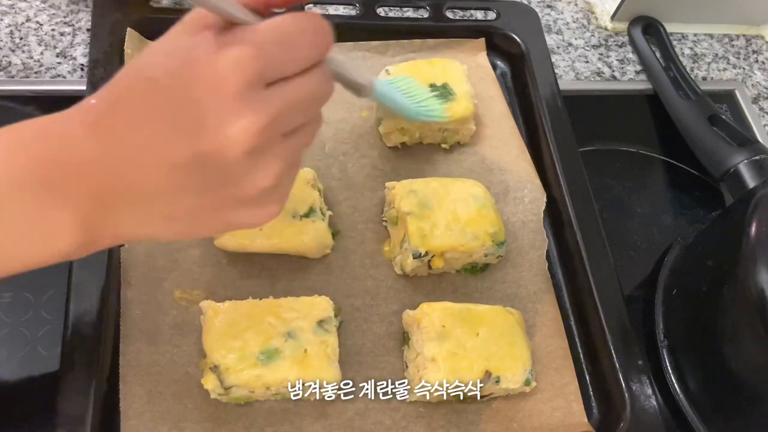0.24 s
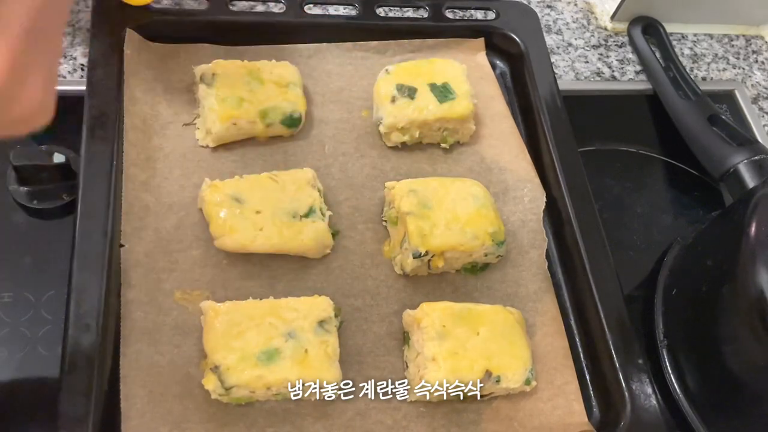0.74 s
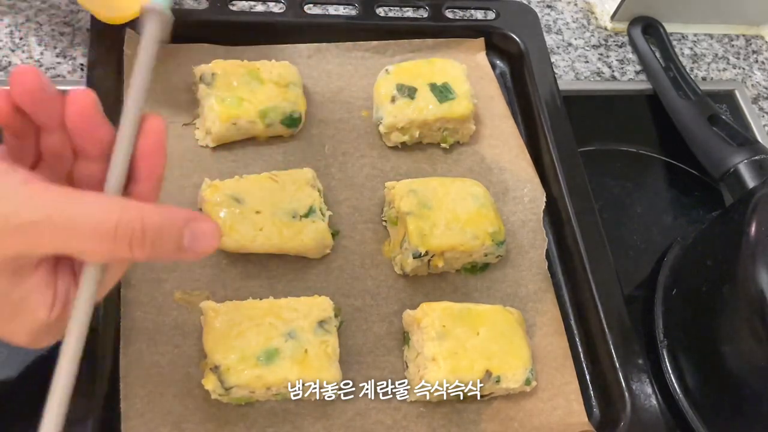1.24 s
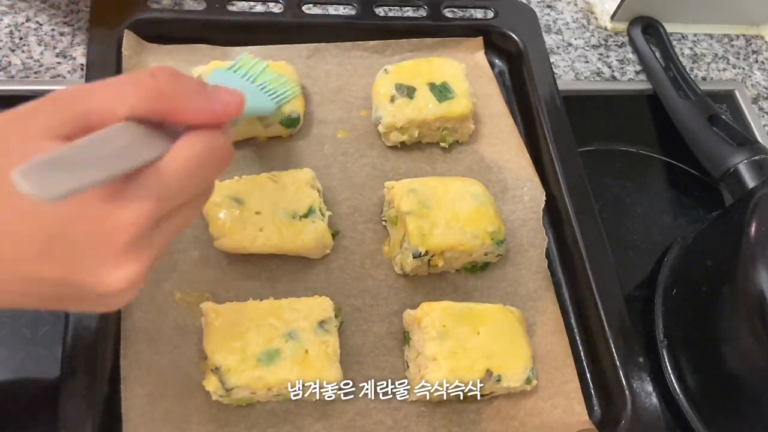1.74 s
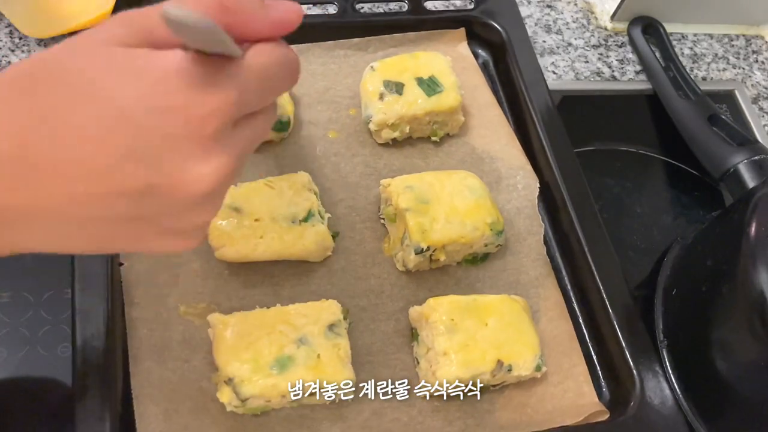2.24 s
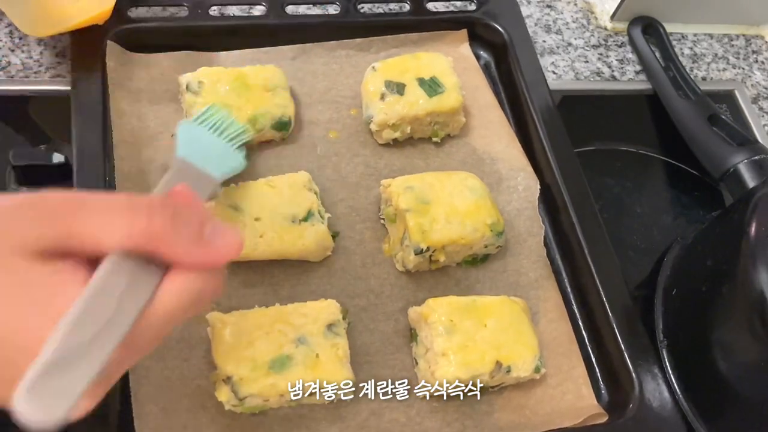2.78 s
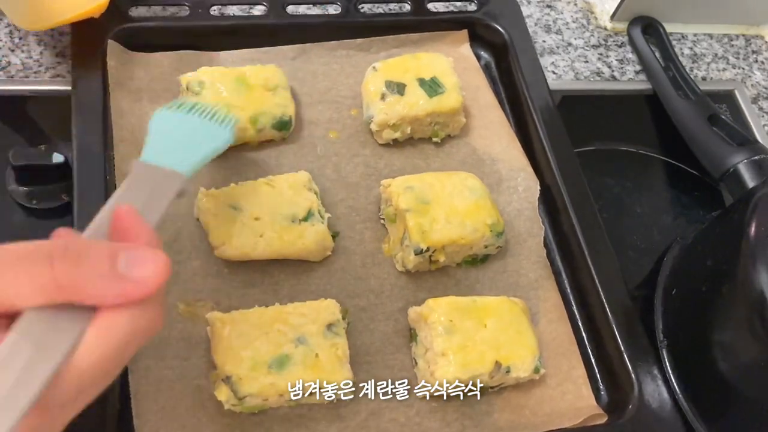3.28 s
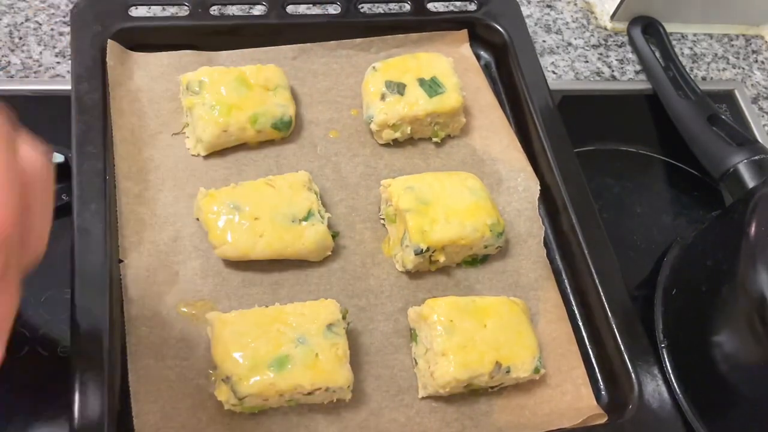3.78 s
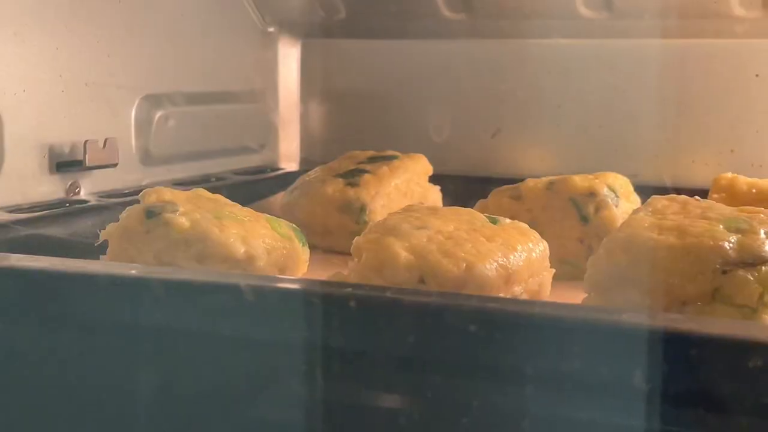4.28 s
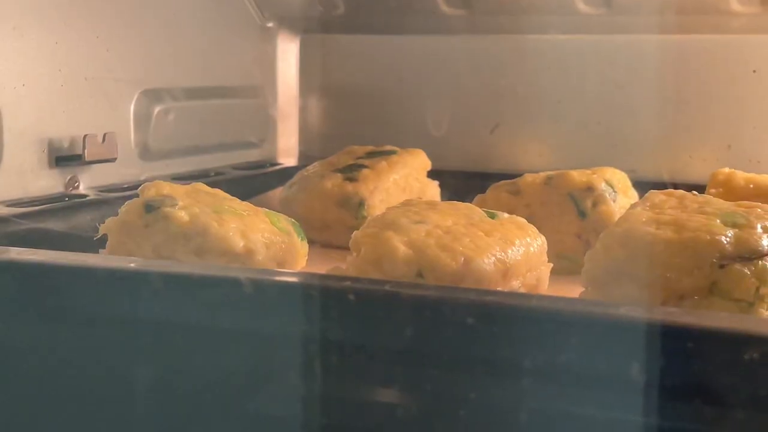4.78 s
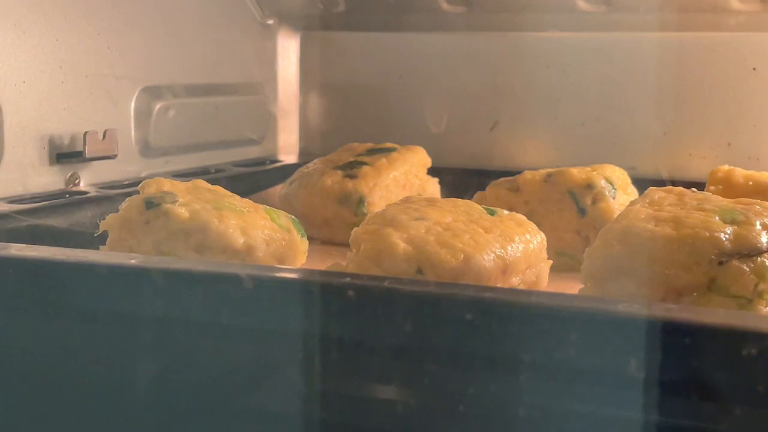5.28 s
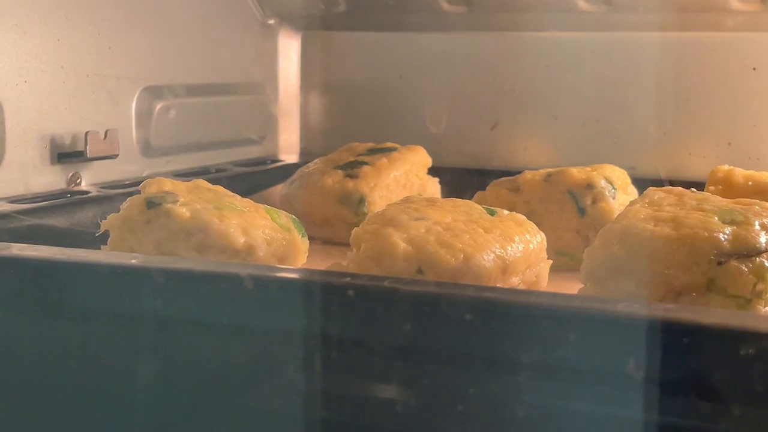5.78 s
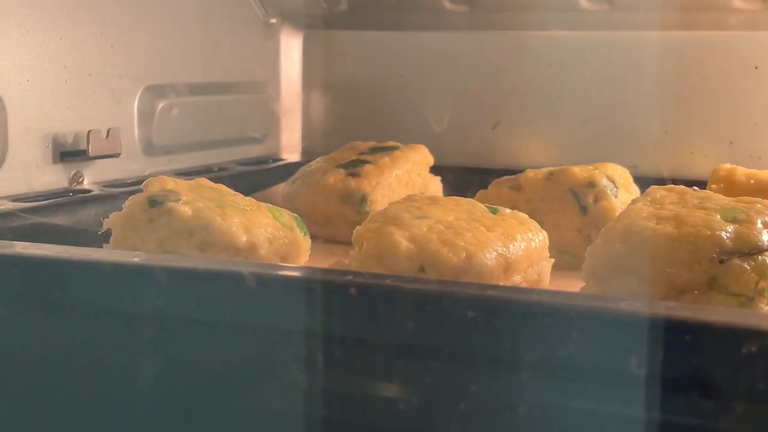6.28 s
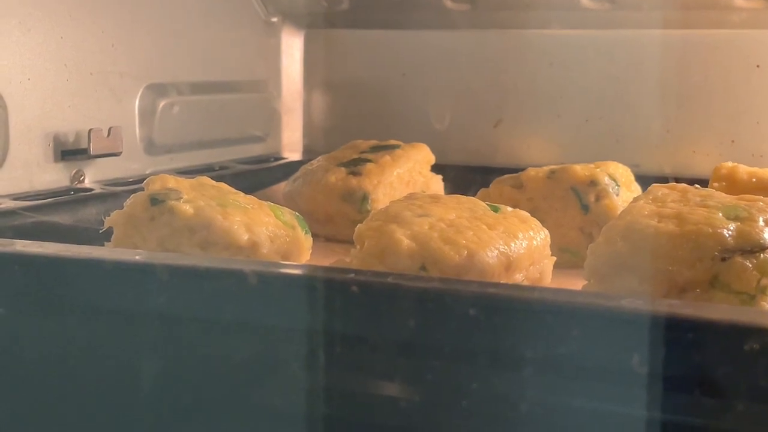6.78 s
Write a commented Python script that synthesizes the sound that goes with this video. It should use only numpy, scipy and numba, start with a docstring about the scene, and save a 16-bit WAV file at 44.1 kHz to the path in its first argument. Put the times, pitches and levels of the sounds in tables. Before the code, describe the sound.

A quiet kitchen heard closely in stereo on a phone. From 0 to 4.2 s a deep fridge hum swells and sags under very faint air hiss. A soft pastry brush works on dough: barely audible wipes at 0.5-1 s, small pinging taps at 0.85 and 1.1, a faint tick at 1.4, then a swipe at 1.8 and the firmest cluster of knocks at 2.0-2.1. Lighter dabs follow at 2.3, 2.5 and 3.2, with brisk taps and bristly scrapes at 3.4-3.55 and again from 3.8 to 4.1. At 4.2 s a hard cut lands close to the oven: a low, uneven fan drone with thin rush, growing fuller near the end at 7 s. A clockwork timer ticks and tocks crisply about every 0.28 s from 4.3 to 6.8, each beat preceded by tiny clicks. Dull, falling thumps come at 4.44, strongest, then softer at 5.54 and 6.65.

```python
"""A fridge hums under a faint kitchen hiss while a soft brush wipes and dabs dough on a paper-lined tray.
After a cut, close to the oven door, a fan drones, a clockwork timer ticks and three dull thumps slide down.
Brush and timer are noise bursts through resonances, thumps are falling swings, and fridge and fan are
wavering sine partials with coloured noise around them. A phone with two microphone ports hears it all."""
import sys
import numpy as np
from scipy import signal
from scipy.fft import rfft, irfft
from scipy.io import wavfile
from scipy.ndimage import uniform_filter1d
from numba import njit

SR = 44100
rng = np.random.default_rng(int(sys.argv[2]) if len(sys.argv) > 2 else 0)


def put_to_file(sound):
    """Save the sound as 16-bit audio at rate SR, in the file named by the first command-line argument."""
    columns = np.atleast_2d(sound).T  # one column per channel
    safe = np.clip(columns, -1, 1)
    whole_steps = np.round(safe * 32767)
    wavfile.write(sys.argv[1], SR, whole_steps.astype(np.int16))


N = 310023  # samples


def undb(db):
    """Amplitude factor of a level in dB."""
    return 10 ** (np.asarray(db) / 20)


def level(x, db):
    """Set the RMS level in dB."""
    return x * undb(db) / np.sqrt(np.mean(x ** 2))


def curves(rows):
    """Columns of a (start_s, ..) table, one value a sample."""
    s, *columns = np.transpose(rows)
    return [np.interp(np.arange(N) / SR, s, c) for c in columns]


def on_bins(table):
    """Columns of a (pitch_hz, ..) table, one value a spectrum bin, drawn over log frequency."""
    hz, *columns = np.transpose(table)
    bin_hz = np.arange(N // 2 + 1) * SR / N
    return [np.interp(np.log(bin_hz + 1), np.log(hz), c) for c in columns]


def band(x, lo_hz, hi_hz, order=2):
    """Band-pass between two corners."""
    corners = [lo_hz, min(hi_hz, .45 * SR)]
    return signal.sosfilt(signal.butter(order, corners, "band", fs=SR, output="sos"), x)


@njit
def moving_band(x, hz, sharp):
    """State-variable band-pass with a moving centre, gain 1 at the centre."""
    y, b, l = np.empty(len(x)), 0., 0.
    for i in range(len(x)):
        g = np.tan(np.pi * hz[i] / SR)
        v = (b + g * (x[i] - l)) / (1 + g * (g + 1 / sharp))
        b, l, y[i] = 2 * v - b, l + 2 * g * v, v / sharp
    return y


def decay(t, t60_s):
    """Exponential fade that falls 60 dB in t60_s."""
    return np.exp(-np.log(1000) * t / t60_s)


def walk(rate):
    """Random levels held 1 / rate s and slewed twice; spread near 1."""
    k = int(SR / rate)
    steps = np.repeat(rng.standard_normal(N // k + 1), k)
    return 1.36 * uniform_filter1d(uniform_filter1d(steps, k), k)[:N]


def airy(spectrum, flicker_db, rate):
    """Two unrelated noises of one colour; each octave flickers on its own."""
    bins = rfft(rng.standard_normal((2, N))) * undb(on_bins(spectrum)[0])
    octave = np.log2(np.arange(N // 2 + 1) * SR / N + 1)
    out = 0
    for k in range(4, 16):
        one_octave = irfft(bins * np.clip(1 - abs(octave - k), 0, 1), N)
        out = out + undb(flicker_db * walk(rate)) * one_octave
    return level(out, 0)


def partials(table, turn, waver_db, waver_rate, drift_rad, drift_rate):
    """Sines at multiples of one turning phase, each wavering in level and drifting in phase."""
    out = np.zeros(N)
    for multiple, db in table:
        phase = multiple * turn + drift_rad * walk(drift_rate) + rng.uniform(0, 2 * np.pi)
        out += undb(db + waver_db * walk(waver_rate)) * np.sin(phase)
    return out


def ring(push, modes):
    """A push sets decaying modes going, each a one-pole complex resonator."""
    out = 0
    for hz, db, t60_s in modes:
        pole = np.exp(2j * np.pi * hz / SR - np.log(1000) / (t60_s * SR))
        out = out + undb(db) * signal.lfilter([1], [1, -pole], push).imag
    return out


# Wipes of the brush: start_s, length_s, start_level_db, end_level_db, treble_db, low_body_db, rub_pitch_hz
WIPES = [(0.502, .12, -96, -91.5, 3.5, 8.5, 1900), (0.652, 0.21, -84.5, -86, -17, -1, 1620),
         (0.873, 0.19, -85, -90, -19, 4.5, 1640), (1.76, 0.066, -68.5, -67.5, -12, -14, 1920),
         (1.837, 0.058, -72.5, -80, -22, -13, 1950), (1.994, .06, -57, -69.5, 4.5, -8.5, 1850),
         (2.232, .05, -90, -91, 7, -3, 1730), (2.9, 0.075, -84, -89, -20, 0.5, 1610),
         (3.02, 0.23, -83.5, -81.5, -16, -5, 1930), (3.203, 0.2, -86, -87, -15, -1, 1980),
         (3.395, 0.11, -71, -76, 0.5, -5.5, 2190), (3.501, 0.028, -56, -66, -4, -7.5, 3000),
         (3.548, 0.15, -73.5, -80.5, 4, -13, 2820), (3.728, 0.095, -89, -82, 3, -8, 1700),
         (3.869, .25, -72.5, -70, -2, -2.5, 1820), (4.125, 0.063, -69.5, -53, 2.5, -7, 3040)]
# Bright resonances of the bowl: pitch_hz, level_db, t60_s
BOWL_MODES = [(3350, 0, .006), (4800, -8, .005), (6900, -1, .005), (8000, -8, .004)]
LAND_S, LIFT_S = 0.014, 0.032  # fade-in before the start, fade-out after the end
PATCHY_DB, PATCHES_PER_S = 2.5, 60


def strokes():
    """Wet bristles slip in dense uneven clicks; the contact rings at its pitch, tray low, paper and bowl high."""
    t = np.arange(N) / SR
    gain = np.zeros((3, N))  # rub, tray, paper
    for s, length, start_db, end_db, treble_db, body_db, _ in WIPES:
        land = np.clip((t - s) / LAND_S + 1, 0, 1)
        lift = np.clip((s + length - t) / LIFT_S + 1, 0, 1)
        sweep = undb(np.interp(t, [s, s + length], [start_db, end_db]))
        gain += (land * lift) ** 2 * sweep * undb([[0], [body_db], [treble_db]])
    gain *= undb(PATCHY_DB * walk(PATCHES_PER_S))  # the bristles catch and let go

    # the rub pitch holds through each stroke and glides to the next
    hz = curves([(r[0] + end * r[1], r[-1]) for r in WIPES for end in (0, 1)])[0]
    slips = rng.standard_normal(N) * undb(3.1 * rng.exponential(size=N) + 2.9 * walk(150))
    fine = rng.standard_normal(N) * undb(1.5 * rng.exponential(size=N) + 1.5 * walk(100))
    rub = moving_band(moving_band(slips, hz, 1.8), hz, 1.6)
    rub = level(rub, -2.1) + level(band(fine, 2400, 7300), -12.5)
    tray = level(band(fine, 240, 1220), 0.89)
    paper = level(band(fine, 4000, 10000), -2.5)
    paper += level(band(fine, 8700, 15200), -8.5)
    bowl = level(ring(fine[::-1], BOWL_MODES), 0)  # reversed, so it does not follow the paper
    return np.sum(gain * [rub, tray, paper + bowl], axis=0)


# Dabs of brush and handle: start_s, level_db, pitch_hz, clear_ping_db, treble_db, low_body_db, knock_t60_s
DAB_HITS = [(0.8478, -69, 2230, 9.5, -33, -16, .05), (0.8622, -65, 1880, 10, -33, -19, .14),
            (1.099, -57.5, 1720, 9, -20, -4.5, 0.15), (1.396, -74, 2550, -10, 12, -16, 0.082),
            (1.708, -84.5, 1430, -10, 21.5, 9, 0.059), (1.9758, -49, 1170, 0, -12, -9, 0.092),
            (1.9778, -49.5, 1820, 1, -16, -16, 0.097), (2.0075, -55, 3420, 11, -16, -8, 0.06),
            (2.027, -60, 1800, -6, -13, -18, 0.062), (2.079, -55, 2140, -15, -7, -10, 0.049),
            (2.297, -62.5, 2220, -10, -9, -11, .035), (2.31, -69, 1900, -10, -12, -11, 0.045),
            (2.454, -86, 1440, -10, 10, -5, .055), (2.5405, -67.5, 1820, -10, -20, -10, 0.043),
            (2.7904, -76.5, 1460, -10, 2.5, -11, 0.066), (3.018, -72, 1790, -10, -3, -12, .055),
            (3.2021, -61.5, 2400, -10, -8, -24, 0.044), (3.3982, -60, 2300, 5, -1, -31, 0.051),
            (3.426, -49.5, 2150, -2, -2.5, -18, 0.028), (3.492, -57, 3220, 2, -19, -19, .047),
            (3.839, -59.5, 1800, -6, 5.5, -21, 0.038), (3.901, -62.5, 1280, -8, -7, 7, 0.066),
            (3.982, -63.5, 1790, 8.5, -1, -22, 0.044), (4.049, -67, 1570, -6, 4, -9, 0.07)]
CLICK_DB, KNOCK_DB = -4, -3
PING_T60_S, THUD_HZ = 0.027, 482


def dabs():
    """Each dab clicks, pings and knocks at the contact pitch, over a tray thud and under a bright smack."""
    out, t = np.zeros(N + SR), np.arange(SR // 5) / SR
    attack = np.clip(t / 0.00037, 0, 1)
    noises = rng.standard_normal((len(DAB_HITS), 4, len(t)))
    for (s, db, hz, ping_db, treble_db, body_db, t60_s), noise in zip(DAB_HITS, noises):
        # reversed: the filters run on noise that is already going, so the attack stays crisp
        click = level(band(noise[3], hz / 1.5, hz * 1.7)[::-1], CLICK_DB) * np.exp(-t / .003)
        ping = undb(ping_db) * np.sin(2 * np.pi * hz * t) * decay(t, PING_T60_S)
        knock = level(band(noise[0], hz / 1.224, hz * 1.1)[::-1], KNOCK_DB) * decay(t, t60_s)
        thud = level(band(noise[2], THUD_HZ / 2.4, THUD_HZ * 1.57)[::-1], body_db) * decay(t, 1.27 * t60_s)
        smack = level(band(noise[1], 2700, 14000, order=1), treble_db) * decay(t, 0.59 * t60_s)
        dab = click + ping + knock + thud + smack
        out[int(s * SR):][:len(t)] += undb(db) * attack * dab
    return out[:N]


# Escapement beats, tick and tock in turn: start_s (the drop), drive_db, unlocking_lead_s, push_lead_s
TIMER_BEATS = [(4.3238, -34, 0.072, 0.039), (4.6051, -37, 0.035, 0.015), (4.8805, -34, 0.055, 0.026),
               (5.16, -37.5, 0.035, 0.017), (5.4351, -34.5, 0.063, 0.041), (5.7166, -37, 0.035, 0.015),
               (5.9952, -34.5, .0629, 0.028), (6.2751, -37.5, 0.03, 0.013), (6.5525, -34, 0.057, 0.036),
               (6.8325, -35, 0.028, 0.013)]
# Unlocking, push and drop of a tick, then of a tock: level_vs_beat_db, high_shiver_db, low_shiver_db
BEAT_CONTACTS = [
    [(-21, -11, 1.5), (-14.5, -7.5, -9), (-0.5, -20.5, -19.5)],
    [(-15, -18, -40), (-11, -32, -21), (0, -11.5, -22)],
]
# Lone light clicks: start_s, drive_db
STRAY_CLICKS = [(5.291, -55)]
# Resonances of the timer case: pitch_hz, level_db, t60_s
CASE_MODES = [(1880, -11, 0.023), (2320, -14, 0.022), (2804, -10.5, 0.035), (3050, -4.5, 0.021),
              (3337, -1, 0.011), (3940, -2.5, 0.0057), (4414, -1, 0.012), (4704, -0.5, 0.011),
              (5500, -4, 0.005), (6180, -11, .01), (6800, -8.5, 0.011), (7400, -3, 0.0026),
              (8500, -15, 0.0049), (10300, -19, 0.0078), (12800, -71, 0.0025)]
# Loose part with the high shiver: pitch_hz, level_db, t60_s
HIGH_SHIVER_MODES = [(4290, -3, .018), (4450, 0, .025), (4680, -2, .015)]
# Loose part with the low shiver: pitch_hz, level_db, t60_s
LOW_SHIVER_MODES = [(2620, -2, .014), (2760, 0, .018)]
STRAY_SHIVER_DB, CONTACT_SCATTER_DB = -9, 3
HARD_DB, HARD_HZ, DULL_HZ_PER_DB = -34, 14000, 480  # top of a hard contact; lighter ones are duller


def timer():
    """Each escapement contact clicks, then the works rattle on through the short resonances of the case."""
    contacts = []
    for k, (s, db, *leads) in enumerate(TIMER_BEATS):
        for lead, (under_db, high_db, low_db) in zip([*leads, 0], BEAT_CONTACTS[k % 2]):
            contacts.append((s - lead, db + under_db, high_db, low_db))
    contacts += [(s, db, STRAY_SHIVER_DB, STRAY_SHIVER_DB) for s, db in STRAY_CLICKS]
    # no two contacts set the loose parts going alike
    scatter = CONTACT_SCATTER_DB * rng.standard_normal((len(contacts), 4))
    contacts = np.array(contacts) + scatter * [0, 0, 1, 1]

    push, t = np.zeros((3, N + SR)), np.arange(SR // 6) / SR
    fade = np.exp(-t / 0.0021) + 0.37 * np.exp(-t / 0.0069) + 0.047 * np.exp(-t / 0.076)
    noises = rng.standard_normal((len(contacts), 3, len(t)))
    for (s, db, high_db, low_db), noise in zip(contacts, noises):
        top_hz = np.clip(HARD_HZ + DULL_HZ_PER_DB * (db - HARD_DB), 3000, 19000)
        rattle = band(noise[0] * fade, 300, top_hz, order=1)
        rattle *= np.clip(t / 0.0001 * undb(db + 43.5), 0, 1)  # light contacts build up more slowly
        shivers = noise[1:] * np.exp(-t / np.array([[.022], [.02]]))  # two loose parts shiver on
        gains = undb([[db], [db + high_db], [db + low_db]])
        push[:, int(s * SR):][:, :len(t)] += gains * np.vstack([rattle, shivers])
    case = undb(-25) * band(ring(push[0, :N], CASE_MODES), 2020, 11600, order=1)
    high_shiver = undb(-30) * ring(push[1, :N], HIGH_SHIVER_MODES)
    low_shiver = undb(-25) * ring(push[2, :N], LOW_SHIVER_MODES)
    return case + high_shiver + low_shiver


# Dull thumps: start_s, level_db, blur_s (a longer one starts lower), length_s
THUMP_HITS = [(4.4393, -29, 0.00067, 0.027), (5.543, -40, 0.0034, 0.023), (6.651, -38, 0.0025, 0.019)]


def thumps():
    """A few swings whose pitch drops as one over time: the treble comes first, the bass last."""
    out, t = np.zeros(N), np.arange(SR // 10) / SR
    for s, db, blur, length in THUMP_HITS:
        hz = 30 + .95 / (t + blur)
        swing = np.sin(2 * np.pi * np.cumsum(hz) / SR)
        shape = np.clip(t / 0.00063, 0, 1) * np.cos(np.pi / 2 * np.clip(t / length, 0, 1) ** 2.1)
        out[int(s * SR):][:len(t)] -= undb(db) * shape * swing
    return np.array([out, out])


# Fan over time: start_s, low_drone_db, rumble_db
FAN_LEVELS = [(4.21, -47, -50), (4.4, -47.5, -53.5), (4.57, -46, -52.5), (4.8, -46.5, -60),
              (5.09, -51, -59), (5.37, -48, -57.5), (5.87, -52, -64), (6.11, -50.5, -58.5),
              (6.7, -45, -61.5), (6.86, -43, -53.5), (7.03, -43.5, -54.5)]
# Partials of the shaft rate: multiple, relative_level_db
SHAFT_PARTIALS = [(6, 3), (7, -1.5), (10, -15.5), (11, -2.5), (14, -9.5), (15, -5), (16, -21.5), (17, -4),
                  (18, -14), (19, -11.5), (20, -7.5), (21, -11.5), (25, -13), (26, -39), (29, -26),
                  (31, -19.5)]
# Colour of the droning air: pitch_hz, relative_density_db (per Hz)
DRONE_COLOUR = [(53, -47), (90, -20), (134, 0), (166, -4), (200, 1), (285, -4.5), (361, -4.5), (397, -7),
                (674, -13.5), (758, -21), (843, -19.5), (1100, -27.5), (1500, -41), (1950, -66),
                (3300, -120)]
# Colour of the thin rush: pitch_hz, relative_density_db (per Hz)
RUSH_COLOUR = [(530, -30), (900, 5.5), (1110, -8.5), (1220, -3), (1730, -10), (2690, -7), (3470, -14),
               (4330, -16), (7050, -21.5), (8110, -34), (9000, -26.5), (11100, -32), (14500, -48)]
SHAFT_HZ = 32.92
UPPER_DRONE_DB, RUSH_DB = -64.5, -66


def fan():
    """Multiples of the shaft rate wax and wane over a drone of air, a rumble and a thin rush."""
    drone_db, rumble_db = curves(FAN_LEVELS)
    turn = 2 * np.pi * SHAFT_HZ * np.arange(N) / SR
    lines = np.array([partials(SHAFT_PARTIALS, turn, 2.44, 5, 1.0, 3) for _ in range(2)])
    drone = level(lines, -3.5) + level(airy(DRONE_COLOUR, 1.8, 8), -1.95)
    # the body of the drone swells while its upper part holds steadier
    body = undb(drone_db) * level(band(drone, 60, 720, order=4), 0)
    upper = level(band(drone, 720, 3000, order=4), UPPER_DRONE_DB)
    rumble = undb(rumble_db) * level(band(rng.standard_normal((2, N)), 44, 93), 0)
    rush = undb(RUSH_DB) * airy(RUSH_COLOUR, 1.0, 8)
    return body + upper + rumble + rush


# Hum over time: start_s, level_db
FRIDGE_LEVELS = [(0.0, -49.5), (0.05, -49), (0.28, -48.5), (0.96, -50.5), (1.27, -46), (1.47, -52.5),
                 (1.57, -48), (1.98, -48), (2.08, -51), (2.5, -48), (2.74, -53.5), (3.0, -48),
                 (3.49, -47.5), (3.56, -49.5), (4.1, -46.5), (4.19, -51.5)]
# Overtones of the hum: multiple, relative_level_db
HUM_OVERTONES = [(2, -20.5), (3, -18), (4, -20), (11, -36.5), (12, -36.5), (21, -46)]
FRIDGE_HZ = 68.9


def fridge():
    """Compressor tone that swells and sags, with gently wavering overtones."""
    turn = 2 * np.pi * FRIDGE_HZ * np.arange(N) / SR
    tone = undb(curves(FRIDGE_LEVELS)[0]) * np.sin(turn)
    overtones = np.array([partials(HUM_OVERTONES, turn, 2.1, 1.6, 0.25, 5.5) for _ in range(2)])
    return np.sqrt(2) * (tone + undb(-51) * overtones)  # root 2 turns RMS levels into peaks


# Colour of the kitchen air: pitch_hz, relative_density_db (per Hz)
KITCHEN_COLOUR = [(28, -32.5), (50, -24), (85, -12), (120, -16.5), (160, -9.5), (195, -12), (240, -24),
                  (310, -31.5), (770, -39), (1050, -48.5), (2100, -52), (2750, -51), (3400, -54.5),
                  (4400, -54.5), (8200, -59.5), (13000, -59.5), (16000, -64)]
KITCHEN_DB = -61


def kitchen_air():
    """Soft coloured noise, weighted to the bass, whose octaves flicker."""
    return level(airy(KITCHEN_COLOUR, 2.47, 7.09), KITCHEN_DB)


def scattered(x, t60_s, db):
    """The sound and its scatter from nearby surfaces, as a pair: what both ports share and what they do not."""
    t = np.arange(int(.3 * SR)) / SR
    tails = rng.standard_normal((2, len(t))) * decay(t, t60_s)
    wet = [signal.fftconvolve(x, tail / np.linalg.norm(tail))[:N] for tail in tails]
    return np.array([x + undb(db) * wet[0], wet[1]])


def ports(pair, unlike_share, lead):
    """Left and right: the shared sound arrives out of step, the unlike sound with opposite signs."""
    shared = rfft(pair[0])
    unlike = rfft(pair[1]) * undb(on_bins(unlike_share)[0])
    half_lead = .5j * on_bins(lead)[0]
    return np.array([irfft(shared * np.exp(sign * half_lead) + sign * unlike, N) for sign in (1, -1)])


# Share of unlike sound at the ports, by the tray and by the oven: pitch_hz, unlike_share_db
TRAY_UNLIKE = [(60, -55), (200, -20), (400, -6.5), (750, -1), (1400, 1.5), (2600, -8.5), (6000, -3.5),
               (10600, -31), (14000, -23), (15000, -26.5)]
OVEN_UNLIKE = [(60, -21), (250, -13), (640, -8.5), (1400, -4), (2300, -11), (2900, -23), (6000, -69),
               (8200, -9), (13000, -11)]
# Phase by which left leads right, by the tray and by the oven: pitch_hz, left_lead_rad
TRAY_LEAD = [(60, 0), (600, .15), (2600, .4), (6000, .9), (8500, 1.3), (10700, np.pi), (12500, 4.6),
             (14600, 5.6), (16000, 6.3)]
OVEN_LEAD = [(60, 0), (300, -.25), (1000, 0), (5900, -.1), (7200, -1.6), (8150, -np.pi), (9500, -4.6),
             (11000, -6.1), (12800, -6.5), (14000, -8)]
CUT_S, RESUME_S = 4.195, 4.2005
OVEN_LEFT_DB, OVEN_TOP_HZ = -.9, 13500  # left against right; end of the treble


def scene():
    """Brush, fridge and kitchen air up to the cut; timer, thumps and fan after it."""
    t = np.arange(N) / SR
    tray = scattered(strokes() + dabs(), 0.14, -7.5) + fridge() + kitchen_air()
    tray = ports(tray, TRAY_UNLIKE, TRAY_LEAD)
    oven = scattered(timer(), 0.14, -4.5) + thumps() + fan()
    oven = ports(oven, OVEN_UNLIKE, OVEN_LEAD) * undb([[OVEN_LEFT_DB / 2], [-OVEN_LEFT_DB / 2]])
    # at the oven the sound ends lower in the treble
    oven = signal.sosfilt(signal.cheby1(8, 1, OVEN_TOP_HZ, fs=SR, output="sos"), oven)
    # a cut with quick fades joins the two places
    before = np.clip((CUT_S - t) / 0.0021, 0, 1)
    after = np.clip((t - RESUME_S) / 0.00093, 0, 1)
    return tray * before + oven * after


TOP_HZ = 15800


def record(dry):
    """The phone drops the deepest bass and cuts the top."""
    dry = signal.sosfilt(signal.butter(3, 32, "high", fs=SR, output="sos"), dry)
    return signal.sosfilt(signal.ellip(10, .2, 60, TOP_HZ, fs=SR, output="sos"), dry)


dry = scene()
out = record(dry)
put_to_file(out)
```